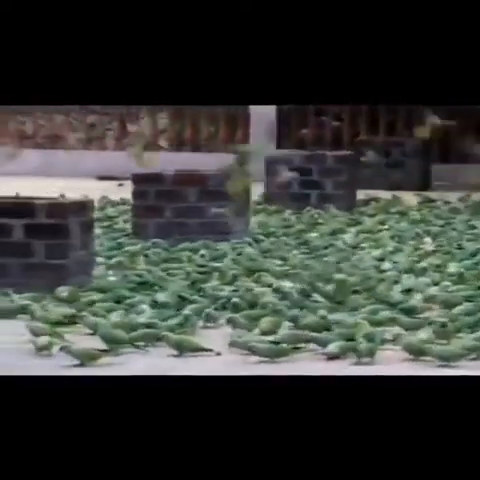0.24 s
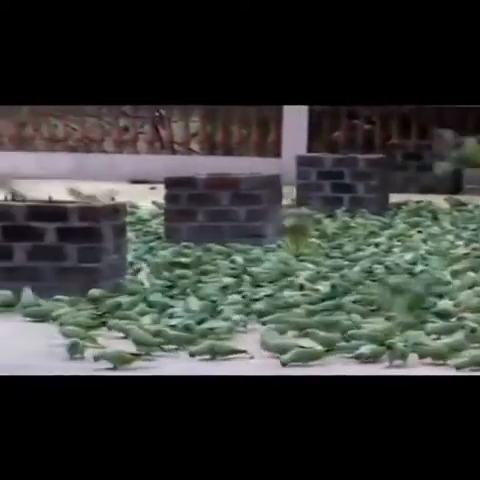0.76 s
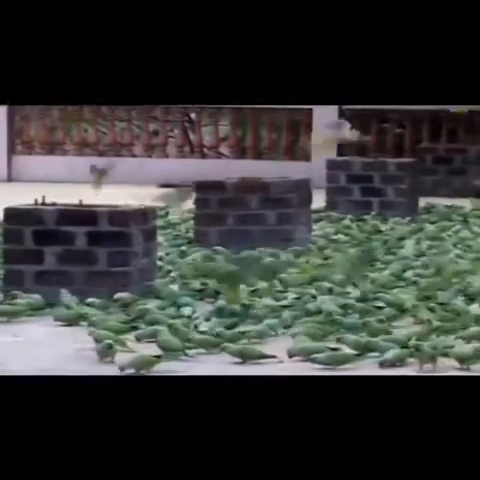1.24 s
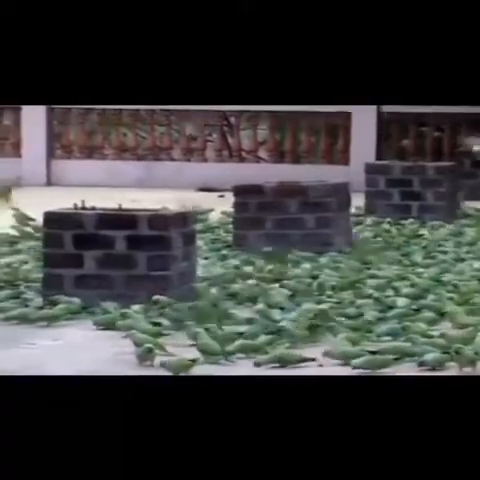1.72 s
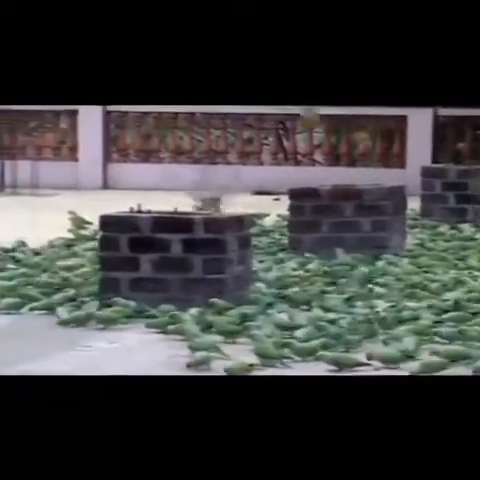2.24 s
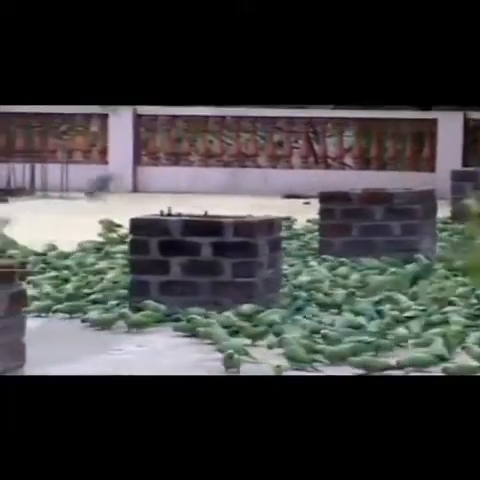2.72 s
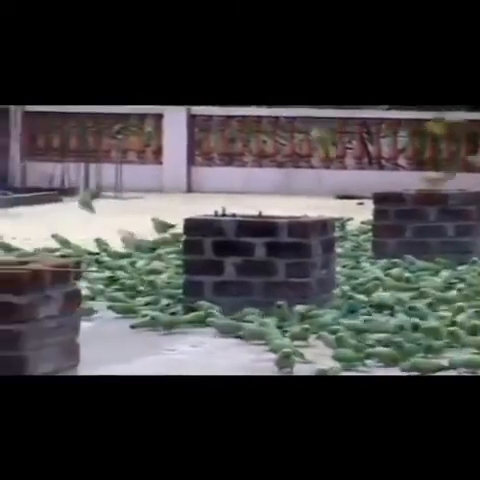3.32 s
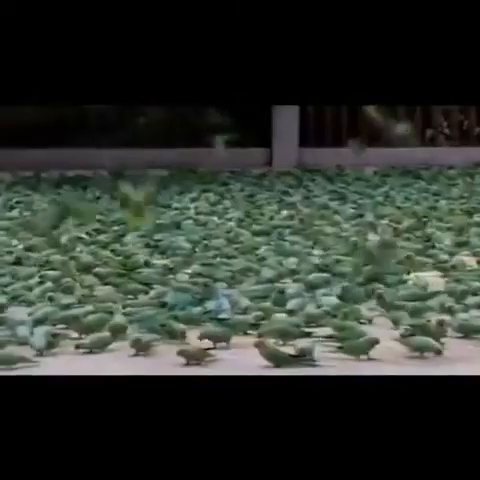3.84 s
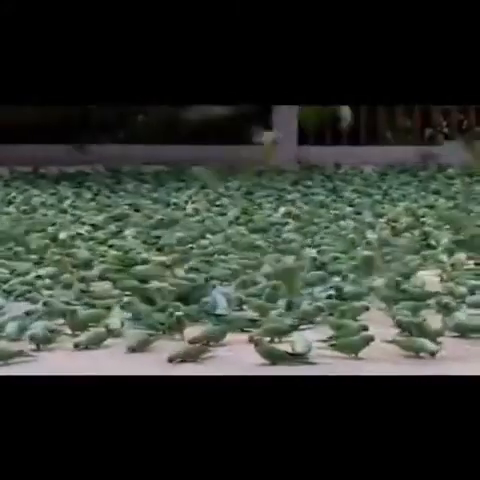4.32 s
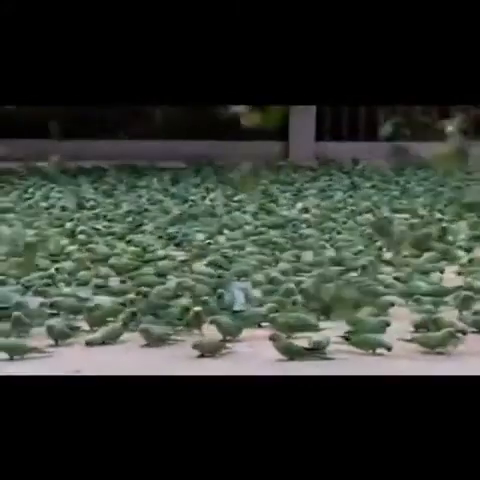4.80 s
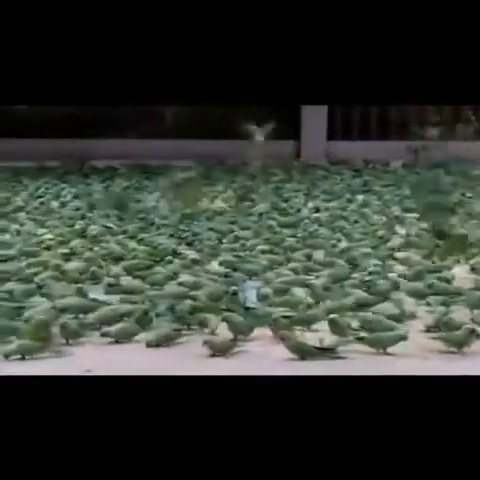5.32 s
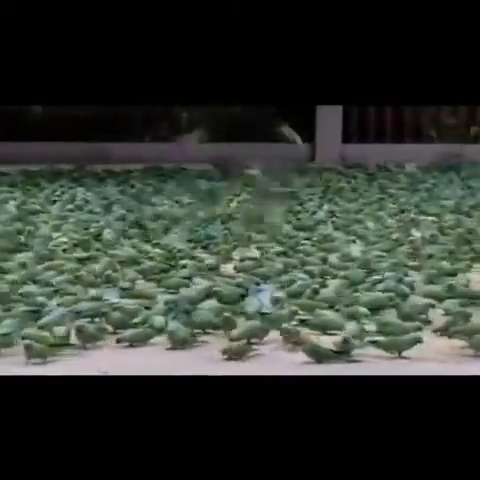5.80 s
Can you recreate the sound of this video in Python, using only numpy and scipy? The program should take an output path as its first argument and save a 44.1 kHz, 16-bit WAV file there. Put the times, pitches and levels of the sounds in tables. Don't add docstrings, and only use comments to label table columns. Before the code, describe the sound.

A parakeet gives ten harsh, buzzy, falling screeches in two quick runs, ringing off the walls of a yard over faint hiss.

```python
import sys
import numpy as np
from scipy import signal
from scipy.fft import rfft, irfft
from scipy.io import wavfile
from scipy.ndimage import uniform_filter1d

SR = 44100
rng = np.random.default_rng(int(sys.argv[2]) if len(sys.argv) > 2 else 0)


def boost(x):
    u = np.asarray(x, float) / 20
    return 10 ** u


def to_wav(sig):
    pcm = np.clip(np.atleast_2d(sig), -1, 1) * 32767
    pcm = np.round(pcm).astype(np.int16)
    wavfile.write(sys.argv[1], SR, pcm.T)


N = 266937

# time after the call begins in seconds, pitch in Hz, level in dB.
OPENING = [
    (0, 620, -43),
    (.003, 674.8, -28.5),
    (.009, 797.7, -41.5),
    (.011, 1250, -32.5),
    (.016, 1385, -19.5),
    (.024, 2602, -20.5),
    (.029, 2766, -30),
    (.030, 3576, -22.5),
]
SLOW_OPENING = [
    (0, 568.5, -38),
    (0.014, 905, -31.5),
    (.014, 1241, -26),
    (.030, 2283, -20.5),
    (.046, 2370, -26),
    (.059, 2756, -23.5),
]
# frequency in Hz, level in dB.
THROAT = [(600, -14), (1200, -20.5), (1900, -19.5), (2700, -18.5), (3050, 1.5), (3500, 1), (4500, -5),
          (5500, -10), (6300, -5.5), (7600, -17.5), (9200, -4.5), (10700, -17), (12300, -22.5),
          (14300, -29.5)]
# frequency in Hz, level in dB per Hz.
RASP = [(24, -91.5), (40, -50), (309, -35), (1050, -65.5), (1910, -23.5), (2330, -20), (2990, -28.5),
        (4030, -21), (5170, -12), (7520, -10.5), (9410, -2.5), (14000, -46), (15500, -71.5)]
# frequency in Hz, level in dB per Hz.
AIR_COLOUR = [(15, -61.5), (25, -26.5), (79, -29), (113, -14.5), (144, -8), (178, 4), (204, -2.5),
              (289, -5.5), (322, -7), (469, -8.5), (3530, -16.5), (14300, -17), (15500, -28.5)]
AIR_DB = -68
# frequency in Hz, level in dB rms.
HUM = [(119, -84), (180, -96.5)]
# its start in seconds, its end in seconds.
DROPOUT_S = (0.97, 1.1295)
# frequency in Hz, time to fade by 60 dB in seconds, level in dB.
YARD = [(300, 0.34, 4.5), (694, .2, 1), (1230, 0.31, -6), (2000, 0.2, 5.5), (3600, 0.24, 0.5),
        (6150, 0.23, -1.5), (10200, 0.15, -3.5), (15100, .17, 3)]
# delay in seconds, level in dB.
ECHOES = [(.0014, -19), (.0028, -35), (.0094, -17), (0.0118, -17), (0.0184, -14.5)]
# call begins, whistle swells, voice breaks, breath ends, all in seconds,
# then the bow of the fall (no unit: plus drops early, minus drops late).
CALLS = [
    (1.097, 1.152, 1.155, 1.262, 0.14),
    (1.415, 1.473, 1.497, 1.608, 0.46),
    (1.765, 1.825, 1.836, 1.953, -0.38),
    (2.125, 2.174, 2.197, 2.308, -0.15),
    (3.605, 3.668, 3.687, 3.800, -0.44),
    (3.935, 3.984, 4.012, 4.112, 0.095),
    (4.272, 4.332, 4.343, 4.450, .4),
    (4.600, 4.648, 4.667, 4.770, 0.82),
    (4.917, 4.984, 4.998, 5.115, 0.44),
    (5.262, 5.318, 5.338, 5.450, .1),
]
# whistle level in dB, screech level in dB, pitch the fall reaches in
# Hz, breathiness in dB, how hollow the high treble is from 0 to 1.
EFFORT = [
    (-15.5, -15.5, 1720, 0.7, 0.06),
    (-13.5, -16, 1690, 3.3, 0),
    (-12.5, -16.5, 1670, 2.3, .05),
    (-14, -16.5, 1620, 3, 0.2),
    (-18.5, -17.5, 1680, 0, .15),
    (-14.5, -16.5, 1680, 1.5, .4),
    (-13.5, -17, 1610, 0, .95),
    (-13.5, -16.5, 1640, 2, 0.6),
    (-12, -16.5, 1730, -5.5, .2),
    (-17.5, -17.5, 1640, -17, 0.2),
]

CALL_SIZE = 12000
WHISTLE_START_HZ, WHISTLE_TOP_HZ, WHISTLE_SAG_HZ_PER_S = 3536, 3656, 9500
WHISTLE_TOP_S = 0.043
FAINT_DB, SWELL_S, WHISTLE_SAG_DB = -9.5, 0.006, -1.5
FALL_TOP_HZ, SNAP_SHARE, SNAP_S = 2557, 0.038, 0.012
KINK_SHARE = 0.009
FALL_START_DB, FALL_EARLY_DB, FALL_EARLY_S, FALL_PEAK_SHARE = -3.9, -2.5, 0.018, 0.5
RELEASE_S, RELEASE_DB = 0.016, -10.5


def rms_one(x):
    return x / np.sqrt(np.mean(x ** 2) + 1e-20)


def at_hz(points, hz):
    points = np.array(points)
    return np.interp(np.log(np.maximum(hz, 1)), np.log(points[:, 0]), points[:, 1])


def coloured(spectrum, size):
    hz = np.fft.rfftfreq(size, 1 / SR)
    white = rng.standard_normal(size)
    return rms_one(irfft(rfft(white) * boost(at_hz(spectrum, hz)), size))


def wobble(rate_hz, size):
    r = np.exp(-2 * np.pi * rate_hz / SR)
    drift = signal.lfilter([1], [1, -2 * r, r * r], rng.standard_normal(size + 2000))
    return rms_one(drift[2000:])


def air():
    t = np.arange(N) / SR
    hum = 0
    for hz, db in HUM:
        hum = hum + boost(db - 2 + 2.7 * wobble(9, N)) * np.sin(2 * np.pi * hz * t)
    hiss_level = boost(AIR_DB + 0.6 * wobble(6.3, N))
    return hiss_level * coloured(AIR_COLOUR, N) + hum


def yard(x, wet_db, first_wall_s, far_db, far_slowness):
    t = np.arange(SR // 2) / SR
    white = rng.standard_normal((2, len(t)))
    edges = 250 * 2 ** np.arange(0, 6.1, 0.5)
    tail = 0
    for k, (low, high) in enumerate(zip(edges, edges[1:])):
        middle = np.sqrt(low * high)
        sos = signal.butter(2, [low, high], "band", fs=SR, output="sos")
        band = signal.sosfilt(sos, white[k % 2])
        fall_db = -60 * t / at_hz(YARD, middle)
        level_db = at_hz(np.array(YARD)[:, ::2], middle)
        near_and_far = boost(fall_db) + boost(far_db + fall_db / far_slowness)
        tail = tail + band * boost(level_db) * near_and_far
    tail = tail * np.clip(t / max(first_wall_s, 1e-4), 0, 1)
    tail = boost(wet_db) * tail / np.sqrt(np.sum(tail ** 2))
    for late_s, db in ECHOES:
        tail[round(late_s * SR)] += boost(db)
    return x + signal.fftconvolve(x, tail)[:N]


def whistle_rows(onset, start_s, swell_s, break_s, peak_db):
    end_s, top_s = break_s - 0.003, onset + WHISTLE_TOP_S
    s = np.array([start_s, top_s, swell_s - SWELL_S, swell_s + 0.0025, end_s])
    s = np.sort(np.clip(s, start_s, end_s))
    sagged_hz = WHISTLE_TOP_HZ - WHISTLE_SAG_HZ_PER_S / 10
    hz = np.interp(s, [onset + 0.032, top_s, top_s + 0.1], [WHISTLE_START_HZ, WHISTLE_TOP_HZ, sagged_hz])
    swell_times = [swell_s - SWELL_S, swell_s + 0.002, max(end_s, swell_s + 0.003)]
    db = np.interp(s, swell_times, [FAINT_DB, 0, WHISTLE_SAG_DB])
    return np.transpose([s, hz, peak_db + db])


def fall_rows(break_s, end_s, end_hz, bow, peak_db):
    length_s = end_s - break_s
    u = np.append(np.linspace(0, 1 - RELEASE_S / length_s, 24), 1)
    s = break_s + u * length_s
    glide = (end_hz / FALL_TOP_HZ) ** (u + bow * u * (1 - u))
    snap = 1 + SNAP_SHARE * np.exp(-(s - break_s) / SNAP_S)
    kinks = 1 + KINK_SHARE * wobble(30, 6000)[::240]
    hz = FALL_TOP_HZ * glide * snap * kinks
    peak_s = break_s + FALL_PEAK_SHARE * length_s
    level_times = [break_s, break_s + FALL_EARLY_S, peak_s, end_s - RELEASE_S, end_s]
    db = np.interp(s, level_times, [FALL_START_DB, FALL_EARLY_DB, 0, -1.5, RELEASE_DB])
    return np.transpose([s, hz, peak_db + db])


def screech(onset, opening, whistle, fall, hoarse_db):
    end_s, end_hz, end_db = fall[-1]
    slack = [(end_s, min(end_hz, 1480), end_db), (end_s + 0.006, 1300, end_db - 2)]
    break_s = fall[0][0]
    rows = np.vstack([np.array(opening) + [onset, 0, 0], whistle, fall[:-1], slack])
    rows[:, 0] = np.maximum.accumulate(rows[:, 0])
    t = np.arange(round(onset * SR), round(rows[-1, 0] * SR)) / SR

    jitter = wobble(350, CALL_SIZE)[:len(t)]
    shimmer = wobble(180, CALL_SIZE)[:len(t)]
    breath = coloured(RASP, CALL_SIZE)[:len(t)]
    fray = np.array([wobble(410, CALL_SIZE)[:len(t)] for k in range(14)])

    climbing = uniform_filter1d((t < onset + opening[-1][0]) * 1.0, 90)
    whistling = uniform_filter1d((t < break_s) * 1.0, 90) - climbing
    croaking = uniform_filter1d((t < onset + 0.012) * 1.0, 90)

    pitch = np.exp(np.interp(t, rows[:, 0], np.log(rows[:, 1])))
    roughness = 0.006 - 0.003 * whistling + 0.007 * climbing + 0.035 * croaking
    pitch = pitch * (1 + roughness * jitter)

    order = np.arange(1, 15)[:, None]
    hz = order * pitch
    tilt_db = -2.5 - 2.3 * climbing + 3 * croaking
    overtones_db = tilt_db * np.log2(order) - 7 * whistling * (order > 1)
    settling = np.exp(-np.maximum(t - break_s, 0) / 0.018) * (1 - climbing - whistling)
    overtones_db = overtones_db - 9 * settling * (order > 2) + 5 * settling * (order < 2)
    shut_db = 9 * climbing * np.exp(-((hz - 2700) / 350) ** 2) - 5 * climbing * (hz > 7200)
    heights = boost(at_hz(THROAT, hz) + overtones_db + shut_db) * (hz < 15500)
    heights = heights / np.sqrt((heights ** 2).sum(axis=0) / 2)
    steadiness = 1 - 0.7 * whistling - 0.5 * croaking
    flicker = (0.08 + 0.028 * order ** 2) * fray * steadiness
    phases = order * 2 * np.pi * np.cumsum(pitch) / SR + flicker
    tone = (heights * np.sin(phases)).sum(axis=0)

    muffled = signal.sosfilt(signal.butter(2, 6500, fs=SR, output="sos"), breath)
    shut = np.clip(0.28 * (climbing + whistling), 0, 1)
    breath = shut * muffled + (1 - shut) * breath
    rasp = boost(hoarse_db - 18.5 - 4.6 * whistling - 1.3 * climbing + 3 * croaking) * breath

    breaking_db = -7 * np.exp(-((t - break_s + 0.0015) / 0.0015) ** 2)
    fade = boost(breaking_db) * np.clip((t[-1] - t) / 0.004, 0, 1)
    flutter_db = (3.2 + 2.2 * whistling) * np.tanh(shimmer)
    level = boost(np.interp(t, rows[:, 0], rows[:, 2]) - 4.5 + flutter_db) * fade
    return level * (tone + rasp)


def parakeet():
    out = np.zeros(N)
    hz = np.fft.rfftfreq(CALL_SIZE, 1 / SR)
    for k, (onset, swell_s, break_s, end_s, bow) in enumerate(CALLS):
        whistle_db, screech_db, end_hz, hoarse_db, hollow = EFFORT[k]
        opening = np.array(SLOW_OPENING if k == 4 else OPENING)
        whistle_start_s = onset + opening[-1, 0] + 0.0016
        whistle = whistle_rows(onset, whistle_start_s, swell_s, break_s, whistle_db)
        fall = fall_rows(break_s, end_s, end_hz, bow, screech_db)
        call = screech(onset, opening, whistle, fall, hoarse_db)
        edge_db, gap_db, sheen_db = 1.2 - 6 * hollow, 2.5 - 21 * hollow, -1.5 + 8 * hollow
        top_colour = [(30, -15.5), (120, -0.5), (10600, 1), (11600, edge_db), (12600, gap_db), (13300, gap_db),
                      (14000, sheen_db), (15000, sheen_db), (15350, sheen_db - 22.5)]
        start = round(onset * SR)
        out[start:start + CALL_SIZE] += irfft(rfft(call, CALL_SIZE) * boost(at_hz(top_colour, hz)))
    return out


def scene():
    bird = yard(parakeet(), wet_db=-2.0, first_wall_s=0.003, far_db=-25, far_slowness=2.42)
    mono = bird + air()
    return np.array([mono, mono])


def low_pass(x):
    return signal.sosfilt(signal.butter(12, 15930, fs=SR, output="sos"), x)


def record(dry):
    t = np.arange(N) / SR
    gap_start_s, gap_end_s = DROPOUT_S
    live = np.clip((gap_start_s - t) / 0.018, 0, 1) + np.clip((t - gap_end_s) / 0.0003, 0, 1)
    squeeze = 0.8 * np.tanh(dry / 0.8) - dry
    rounded = dry + signal.sosfilt(signal.butter(2, 300, "high", fs=SR, output="sos"), squeeze)
    cut = signal.sosfilt(signal.cheby2(10, 50, 15900, fs=SR, output="sos"), rounded)
    return low_pass(cut * live)


dry = scene()
out = record(dry)
to_wav(out)
```